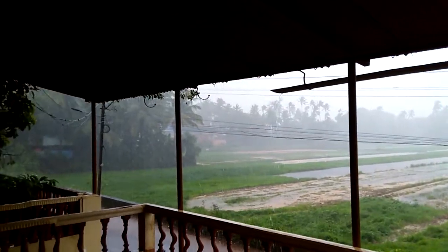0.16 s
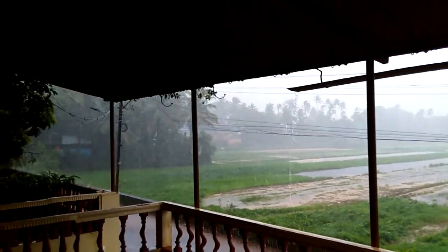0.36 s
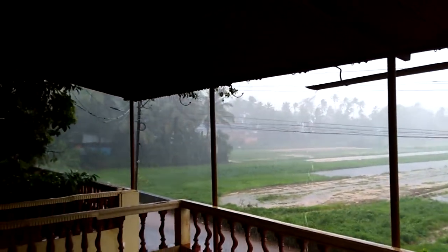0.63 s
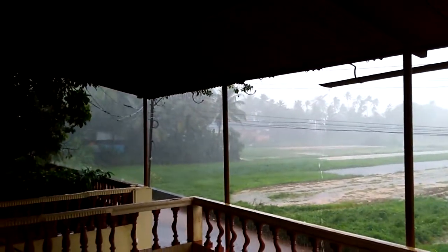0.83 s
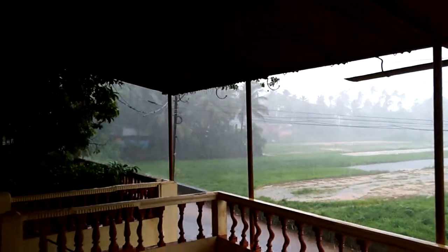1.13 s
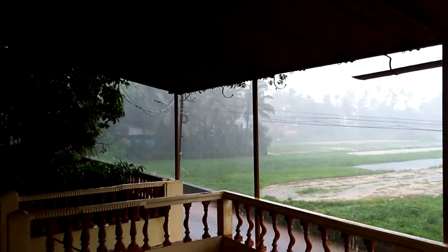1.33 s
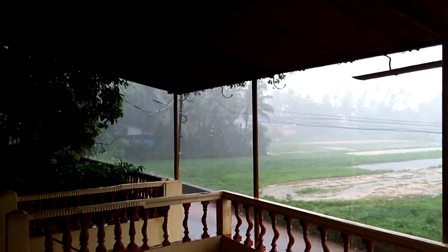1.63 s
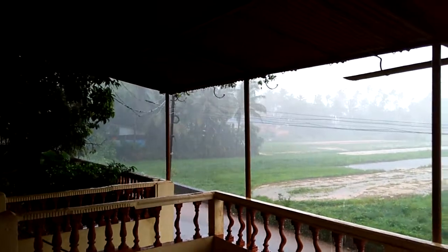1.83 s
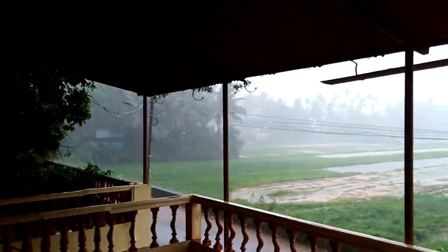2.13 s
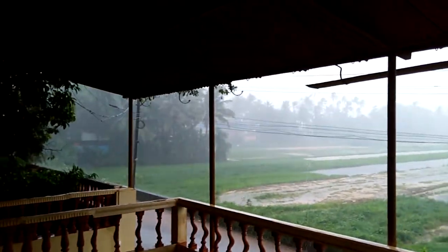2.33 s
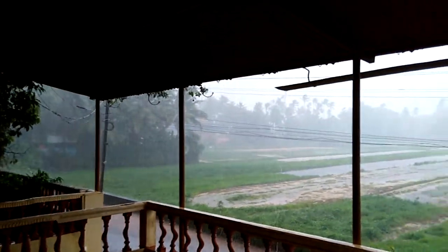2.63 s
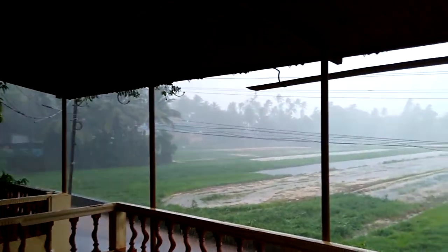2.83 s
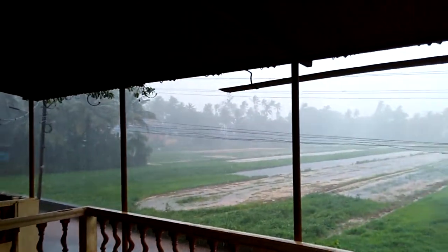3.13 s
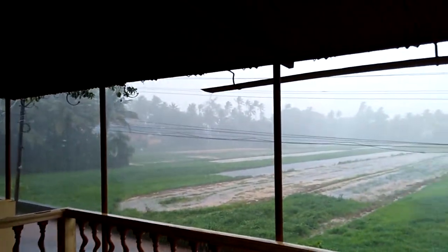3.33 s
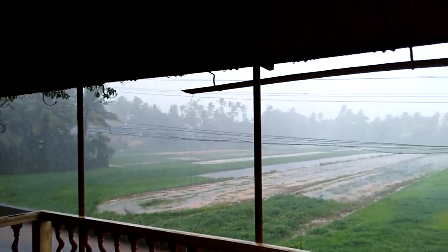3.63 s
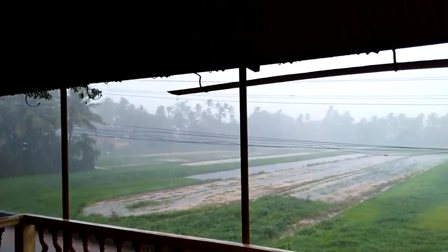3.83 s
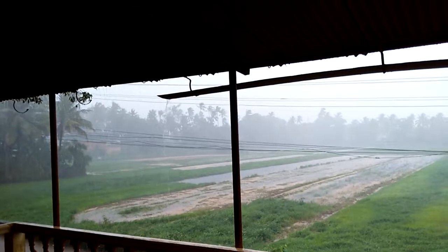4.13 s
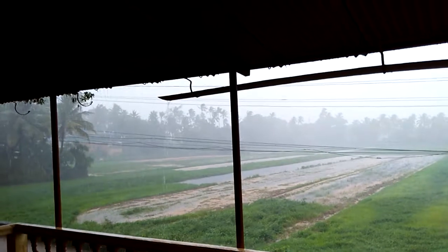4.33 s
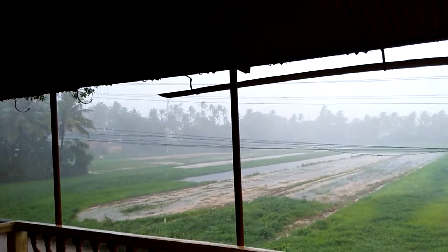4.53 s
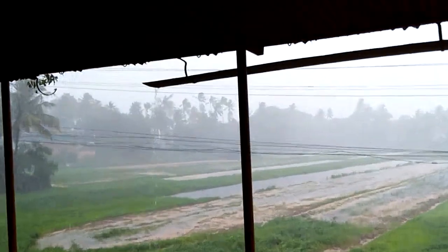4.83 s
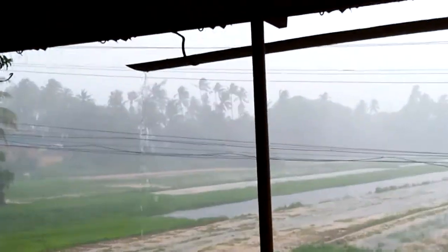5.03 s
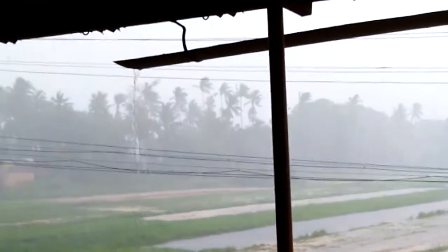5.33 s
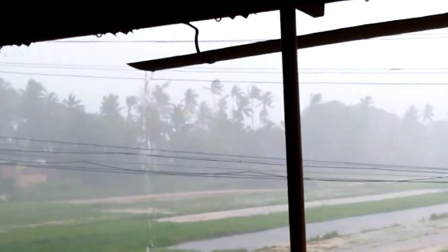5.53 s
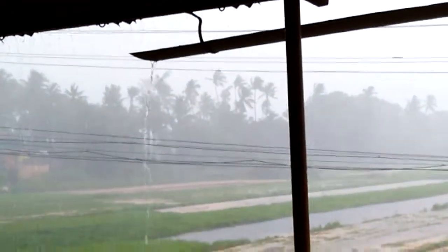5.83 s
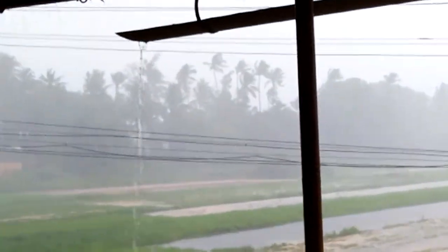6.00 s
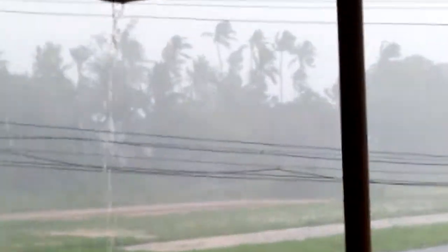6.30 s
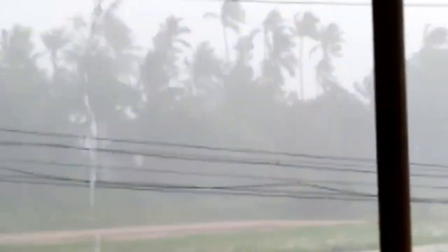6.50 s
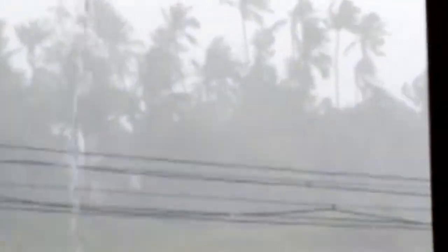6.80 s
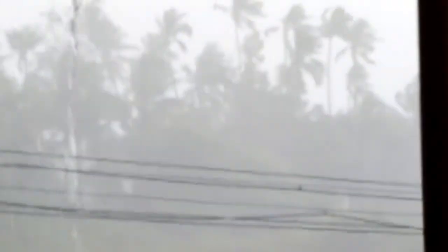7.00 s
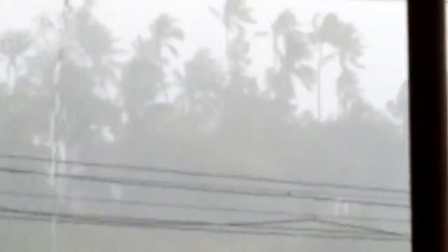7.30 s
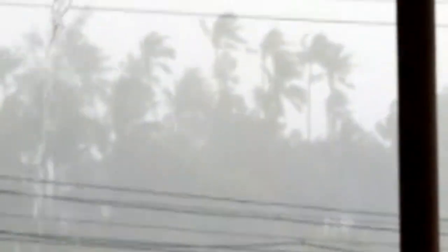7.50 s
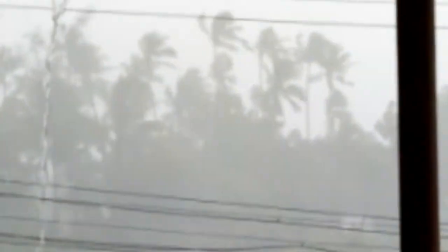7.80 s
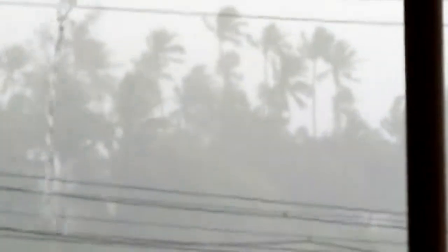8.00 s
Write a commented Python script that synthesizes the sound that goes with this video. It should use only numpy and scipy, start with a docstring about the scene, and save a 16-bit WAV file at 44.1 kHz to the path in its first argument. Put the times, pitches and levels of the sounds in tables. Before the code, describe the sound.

Heavy monsoon rain pours steadily on fields and leaves, a dense hissing roar that slowly swells, with soft low wind thumps mostly on the right.

```python
"""Monsoon rain pours on flooded fields and palms, heard from under a veranda roof, for 8.15 s.
It starts subdued: leaves patter (ringing grains), splashes hiss (short ticks), far drops roar (merged noise).
Wind (low noise) and soft thumps (damped sines) come before 1 s, then near 1.8 and 2.7 s; the rain builds to 4.3 s.
It eases, wind and thumps return from 5 to 7 s, mostly on the right, and the rain peaks again near 6.3 s.
Two microphone ports of opposite polarity and different colour pick it all up."""
import sys
import numpy as np
from scipy import signal
from scipy.fft import rfft, irfft, next_fast_len
from scipy.io import wavfile
from scipy.ndimage import uniform_filter1d, map_coordinates

SR = 44100
rng = np.random.default_rng(int(sys.argv[2]) if len(sys.argv) > 2 else 0)


def store_wav(level_fs):
    """Save 16-bit WAV to argv[1]."""
    pcm = np.round(np.clip(np.atleast_2d(level_fs), -1, 1) * 32767)
    wavfile.write(sys.argv[1], SR, pcm.T.astype(np.int16))


N = 359415  # samples
ONE_WAVE_HZ = 170  # below this the ports grow alike
TOP_HZ = 15800  # upper band edge


def amp(db):
    """Decibels to gain."""
    return 10 ** (np.asarray(db) / 20)


def unit(x):
    """Scale to rms 1 over all channels."""
    return x / np.sqrt(np.mean(x ** 2) + 1e-20)


def along(points, hz):
    """Interpolate (Hz, value) points on a log frequency axis."""
    point_hz, value = np.transpose(points)
    return np.interp(np.log(hz + 1), np.log(point_hz + 1), value)


def curves(rows):
    """One value per sample for each column after the time in seconds."""
    knot_s, *columns = np.transpose(rows)
    t = np.arange(N) / SR
    return [np.interp(t, knot_s, column) for column in columns]


def wobble(rate_per_s):
    """Smooth random curve through rate_per_s random knots a second."""
    knots = rng.standard_normal(int(N * rate_per_s / SR) + 4)
    return map_coordinates(knots, [np.arange(N) * rate_per_s / SR])


def filtered(x, response):
    """Multiply the spectrum of x by response(hz), zero-padded."""
    size = next_fast_len(N + SR // 2)
    gain = response(np.fft.rfftfreq(size, 1 / SR))
    return irfft(rfft(x, size) * gain, size)[..., :N]


def coloured(x, spectrum):
    """Give x the spectral shape, at rms 1."""
    return unit(filtered(x, lambda hz: amp(along(spectrum, hz))))


# Likeness of the rain at the two ports, rippled by their spacing.
# Each row: frequency in Hz, correlation from -1 to 1.
PORT_CORRELATION = [(210, 0.98), (300, 0.93), (550, 0.85), (750, 0.69), (1000, 0.64), (1230, 0.061),
                    (1400, -0.03), (1620, -0.059), (1900, -0.37), (2150, 0.099), (2550, 0.19),
                    (3000, 0.091), (3500, -0.022), (5000, 0.031)]


def surround(pair, spectrum):
    """Mix unrelated signals into sound from all around, at rms 1: long waves reach both ports alike."""
    def gains(hz):
        apart = (1 - along(PORT_CORRELATION, hz)) * np.minimum(hz / ONE_WAVE_HZ, 1) ** 4
        apart = np.clip(apart, 0, 2)
        return amp(along(spectrum, hz)) * np.sqrt([2 - apart, apart])

    shared, opposed = filtered(pair, gains)
    return unit(np.array([shared + opposed, shared - opposed]))


def wash(patchy_db):
    """Countless merged drops: two noises with the same drifting patches of loudness in time and pitch."""
    bins = signal.stft(rng.standard_normal((2, N)), nperseg=512)[2]
    patches = rng.standard_normal(bins.shape[1:])
    patches = uniform_filter1d(patches, size=8, axis=0)
    patches = uniform_filter1d(patches, size=20, axis=1)
    noise = signal.istft(bins * amp(patchy_db * unit(patches)), nperseg=512)[1]
    return unit(noise[:, :N])


def drops(pitch_hz, spread, cycles, size_db, clump_db, clump_rate, count, size=128):
    """Impacts on either side: damped sines of random pitch and weight, size samples long, in flurries."""
    place, shape = rng.random((count, 2)), rng.standard_normal((count, 2))
    hz = np.clip(pitch_hz * np.exp(spread * shape[:, :1]), 200, TOP_HZ)
    starts = (place[:, :1] * N).astype(int)
    flurry_db = clump_db * np.tanh(wobble(clump_rate))[starts]
    weight = amp(size_db * np.minimum(shape[:, 1:], 2) + flurry_db)

    k = np.arange(size)
    turns = hz * k / SR
    grains = weight * np.sin(2 * np.pi * turns) * np.exp(-turns / cycles)

    # both sides lie end to end in one array
    side = N * (place[:, 1:] > .5)
    total = np.bincount((starts + side + k).ravel(), grains.ravel(), 2 * N)
    return unit(total[:2 * N].reshape(2, N))


# Spectral shape of rain on leaves. Each row: frequency in Hz, relative level in dB.
LEAF_SPECTRUM = [(300, -40), (800, -3.5), (1250, -4), (1620, -0.7), (1750, -0.4), (1880, -1), (2100, -1.4),
                 (2700, -2.5), (3500, -7), (5000, -17.5), (12000, -58)]
LEAVES_DB, LEAVES_SWELL = -22.5, 1.06  # rms ahead of the ports at shower 0 dB; dB per dB of shower


def leaves(shower_db):
    """Drops tap the foliage in dense flurries and raise small ringing bubbles in the puddles below."""
    taps = drops(pitch_hz=2620, spread=0.38, cycles=1.96, size_db=2,
                 clump_db=1.6, clump_rate=30, count=24000)
    bubbles = drops(pitch_hz=2201, spread=0.42, cycles=13, size_db=0.5,
                    clump_db=-0.5, clump_rate=7.2, count=1500, size=800)
    mix = wash(patchy_db=0.5) + amp(-8.5) * taps + amp(-15.5) * bubbles
    level_db = LEAVES_DB + LEAVES_SWELL * shower_db
    return amp(level_db) * surround(mix, LEAF_SPECTRUM)


# Spectral shape of close splashes. Each row: frequency in Hz, relative level in dB.
SPLASH_SPECTRUM = [(800, -34), (2200, -1), (3800, -1), (5200, -1.5), (8500, -2.5), (11000, -4.5),
                   (16000, -11)]
# Strength of the spray by the veranda. Each row: time in seconds, level in dB over SPLASH_DB.
SPRAY_CURVE = [(0, -2.4), (.3, -2.4), (.55, -2), (.8, -0.7), (1.0, -1.3), (1.35, -0.7), (1.9, -1.5),
               (2.55, 0.4), (3.1, 0), (4.5, 0.6), (4.9, -1.6), (5.5, -0.1), (5.85, 0.5), (6.15, 0.2),
               (6.28, 2), (6.6, 1), (7.1, 0.5), (8.15, -1)]
SPLASH_DB = -23.5  # rms ahead of the ports at spray 0 dB


def splashes():
    """Drops burst on the wet ground by the veranda in tiny sharp ticks; a few fat ones fall from the eaves."""
    ticks = drops(pitch_hz=7380, spread=0.55, cycles=0.9, size_db=2.0,
                  clump_db=3.5, clump_rate=42, count=24000, size=48)
    drips = drops(pitch_hz=5630, spread=0.36, cycles=1.6, size_db=2.0,
                  clump_db=3, clump_rate=6, count=200)
    mix = wash(patchy_db=1.29) + amp(-9) * ticks + amp(-27) * drips
    level_db = SPLASH_DB + curves(SPRAY_CURVE)[0] + 0.21 * wobble(22)
    return amp(level_db) * surround(mix, SPLASH_SPECTRUM)


# Spectral shape of the distant roar. Each row: frequency in Hz, relative level in dB.
FIELD_SPECTRUM = [(25, -22), (60, -24), (105, -23), (150, -12), (220, -13.5), (300, -7), (410, -5),
                  (480, -3.5), (760, -3), (890, 0.5), (1050, -0.5), (1300, -4.5), (2000, -13), (5000, -62)]
FIELDS_DB, FIELDS_SWELL = -23.5, 0.89  # rms ahead of the ports at shower 0 dB; dB per dB of shower


def fields(shower_db):
    """Distant rain on wet ground: only a dull roar carries this far, drifting in sheets."""
    level_db = FIELDS_DB + FIELDS_SWELL * shower_db + 0.14 * wobble(4.0)
    return amp(level_db) * surround(wash(patchy_db=0.5), FIELD_SPECTRUM)


# Single eddies striking the ports. Each row: start in seconds, envelope peak in dB before the split
# between ports, pitch in Hz, envelope rise in seconds, right over left in dB.
EDDIES = [(.461, -30, 115, .003, 12), (.484, -35, 90, .003, 14), (.541, -28, 135, 0.003, 12),
          (.592, -32, 92, 0.013, 16), (.765, -37, 75, .003, -12), (1.779, -44, 92, .012, 10),
          (1.9, -29, 115, 0.0032, 18), (2.693, -37, 95, .004, 10), (4.118, -33, 120, 0.0019, -8),
          (5.29, -39, 110, .005, 8), (5.704, -27, 165, 0.0032, 12), (5.793, -28, 125, 0.0028, 14),
          (5.856, -35, 150, .002, 10), (5.901, -31, 170, .002, 10), (5.95, -29, 110, .003, 14),
          (6.087, -36, 100, .004, 10), (6.119, -37, 80, .006, 10), (6.153, -28, 115, 0.0028, 10),
          (6.285, -35, 150, 0.0036, 6), (6.44, -38, 85, .004, -6), (6.641, -38, 110, .006, 10),
          (6.776, -37, 100, .005, 8), (6.88, -39, 120, .007, 8), (6.96, -39, 121, 0.0068, 6)]


def puffs():
    """A lone eddy gives the ports, in opposite directions, one soft thump that swings back and dies."""
    out, t = np.zeros((2, N)), np.arange(SR // 8) / SR
    for start_s, peak_db, hz, rise_s, right_db in EDDIES:
        envelope = t / rise_s * np.exp(1 - t / rise_s)
        push = amp(peak_db) * np.sin(2 * np.pi * hz * t) * envelope
        sides = np.array([[-1], [amp(right_db)]]) / (1 + amp(right_db))
        out[:, round(start_s * SR):][:, :len(t)] += sides * push
    return out


# Spectral shape of wind on the ports. Each row: frequency in Hz, relative level in dB.
BUFFET_SPECTRUM = [(20, -16), (40, -14), (60, 1), (90, -1), (150, -4), (230, -9), (500, -23), (2000, -80)]
# Level of the faint low rumble between gusts, with brief dropouts.
# Each row: time in seconds, level in dB before swing, flutter and port gain.
FAINT_RUMBLE_CURVE = [(0, -63), (.14, -63), (.22, -84), (.35, -62), (.85, -61), (.96, -70), (1.12, -59),
                      (1.47, -64), (1.61, -80), (1.7, -56), (2.15, -58), (2.8, -66), (2.95, -83),
                      (3.17, -90), (3.27, -65), (3.86, -72), (4.15, -69), (4.29, -88), (4.38, -61),
                      (4.47, -84), (4.6, -70), (4.85, -71), (4.98, -57), (5.58, -62), (6.04, -59),
                      (7.08, -58), (7.52, -64), (7.68, -80), (7.83, -62), (8.15, -64)]
# Gusts. Each row: start of hold in seconds, hold in seconds, level in dB before flutter and port gain.
GUST_ROWS = [(.41, .08, -51), (.545, 0.094, -45), (.71, 0.054, -53), (1.73, .1, -53), (1.89, .04, -53),
             (2.66, .06, -53), (5.06, .2, -64), (5.277, .03, -55), (5.61, .03, -48), (5.7, .26, -47),
             (6.093, 0.076, -50), (6.27, .07, -49), (6.57, .25, -54), (6.86, 0.1, -48)]
GUST_ATTACK_S, GUST_RELEASE_S = 0.024, 0.035  # exponential time constants
SWING_DB, SWING_RATE_PER_S = 6, 19  # random swing of the faint rumble
FLUTTER_DB, FLUTTER_RATE_PER_S = 7.5, 41  # eddies chopping all the moving air
WIND_LEFT_DB, WIND_RIGHT_DB = -7, 2


def wind():
    """Gusts rise, hold and die away over a faint unsteady rumble; eddies chop both, mostly heard on the right."""
    t = np.arange(N) / SR
    air = amp(curves(FAINT_RUMBLE_CURVE)[0] + SWING_DB * np.tanh(wobble(SWING_RATE_PER_S)))
    for start_s, hold_s, db in GUST_ROWS:
        early_s = np.maximum(start_s - t, 0)
        late_s = np.maximum(t - start_s - hold_s, 0)
        gust = amp(db) * np.exp(-early_s / GUST_ATTACK_S - late_s / GUST_RELEASE_S)
        air = np.hypot(air, gust)
    flutter = amp(FLUTTER_DB * np.tanh(wobble(FLUTTER_RATE_PER_S)))
    rumble = coloured(rng.standard_normal((2, N)), BUFFET_SPECTRUM)
    return air * flutter * rumble * amp([[WIND_LEFT_DB], [WIND_RIGHT_DB]])


# Colour of the left port, before its notch. Each row: frequency in Hz, gain in dB.
LEFT_COLOUR = [(200, -1), (300, -0.42), (2200, 1), (3300, -3), (3800, -2), (4500, -10), (5300, -0.6),
               (8500, 0.47), (10700, 6), (12000, 5), (13500, -1), (15800, -1)]
# Colour of the right port. Each row: frequency in Hz, gain in dB.
RIGHT_COLOUR = [(200, -1.5), (1000, -1.5), (2000, -1.5), (2700, -0.5), (3950, 1.5), (4330, -2),
                (4560, -8.5), (4820, -0.6), (6000, -3), (7000, -9), (8900, -14.5), (9700, -24),
                (12500, -25.5), (15800, -9.5)]
NOTCH_HZ, NOTCH_WIDTH_HZ, NOTCH_DB = 4500, 170, -9  # a cavity in the left port swallows this band


def ports(hz):
    """Gain of the left and right port at each frequency; the colour fades out towards the deep bass."""
    notch_db = NOTCH_DB * np.exp(-((hz - NOTCH_HZ) / NOTCH_WIDTH_HZ) ** 2)
    colour_db = np.array([along(LEFT_COLOUR, hz) + notch_db, along(RIGHT_COLOUR, hz)])
    return amp(colour_db * np.minimum(hz / ONE_WAVE_HZ, 1) ** 2)


# How hard it rains. Each row: time in seconds, level in dB over the usual downpour.
SHOWER_CURVE = [(0.0, -2.5), (0.2, -3), (0.55, -3), (0.73, -1.3), (0.95, -2.5), (1.22, -1.2), (1.65, -2),
                (1.97, -1.7), (2.3, -0.3), (2.75, 0.5), (3.0, 0), (4.05, 1), (4.3, 1.8), (4.6, 1), (4.9, 0),
                (5.4, 0.1), (5.75, 1), (6.35, 2.0), (7.0, 1.4), (8.15, -0.3)]


def scene():
    """Three distances of rain, coloured by the ports, plus moving air striking the ports directly."""
    shower_db = curves(SHOWER_CURVE)[0]
    rain = leaves(shower_db) + splashes() + fields(shower_db)
    return filtered(rain, ports) + puffs() + wind()


PORT_LAG_S = .00056  # travel time between the ports
LOW_CUT_HZ = 35


def record(dry):
    """Flip the right polarity, leak a little of the right into the left late, cut both ends of the band."""
    def leak_response(hz):
        band = (hz > 1000) * (hz < 4000)
        return amp(-21) * band * np.exp(-2j * np.pi * hz * PORT_LAG_S)

    left, right = dry[0], -dry[1]
    leak = filtered(right, leak_response)
    low_cut = signal.butter(4, LOW_CUT_HZ, "highpass", fs=SR, output="sos")
    pair = signal.sosfilt(low_cut, [left + leak, right])
    return filtered(pair, lambda hz: hz < TOP_HZ)


dry = scene()
out = record(dry)
store_wav(out)
```